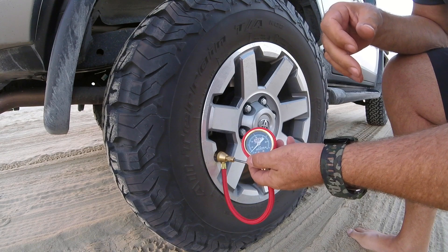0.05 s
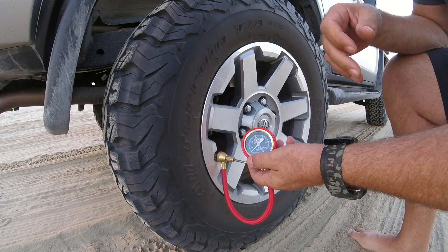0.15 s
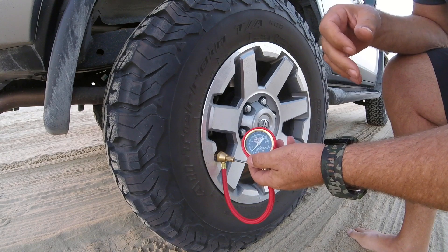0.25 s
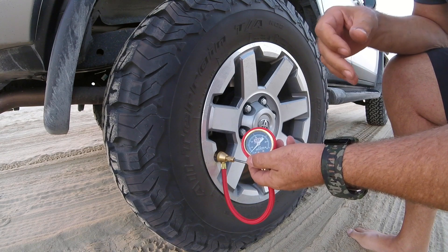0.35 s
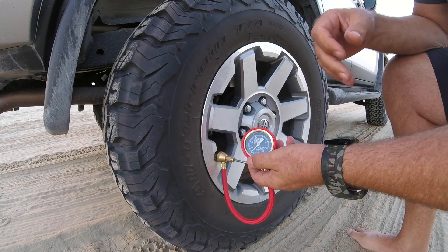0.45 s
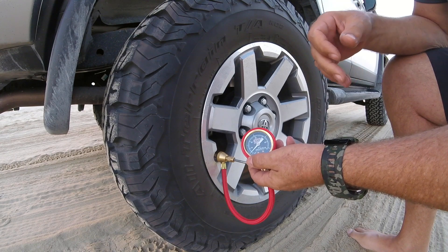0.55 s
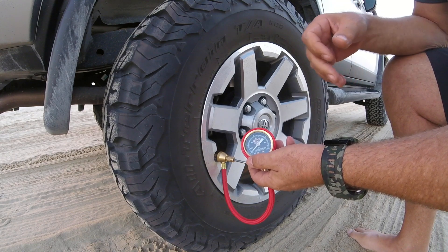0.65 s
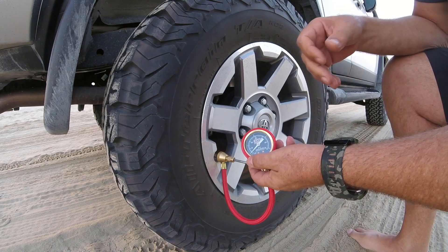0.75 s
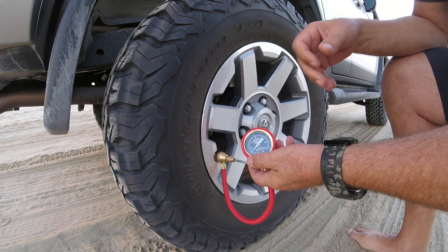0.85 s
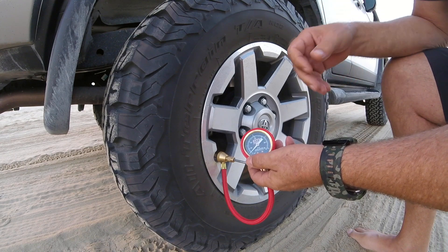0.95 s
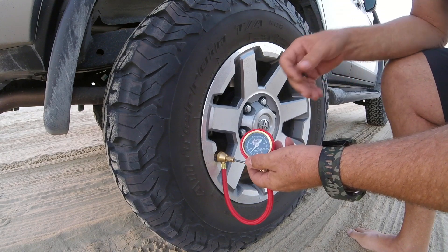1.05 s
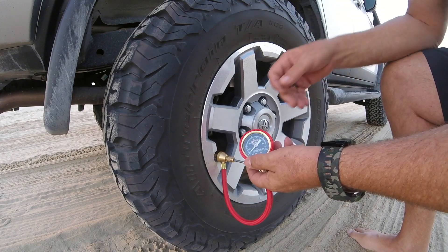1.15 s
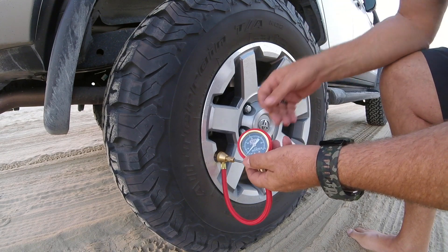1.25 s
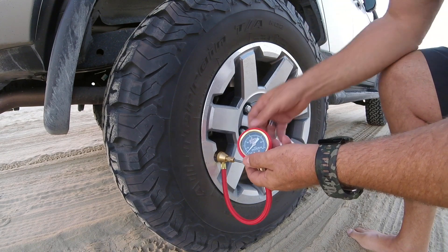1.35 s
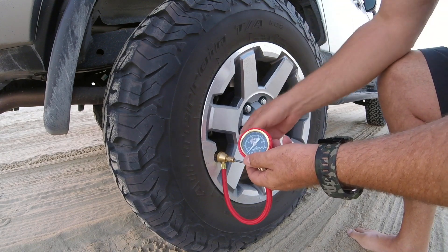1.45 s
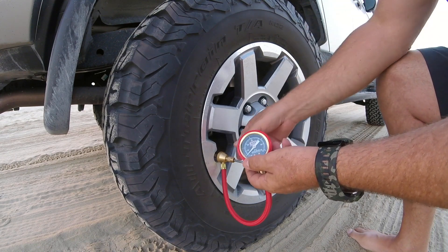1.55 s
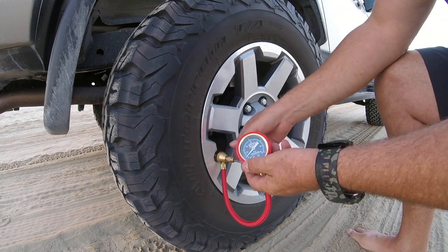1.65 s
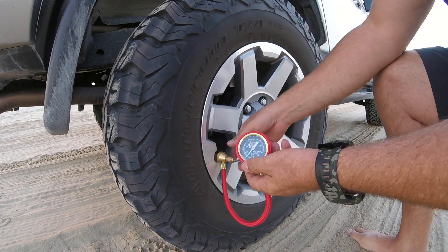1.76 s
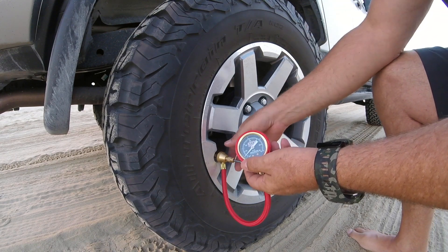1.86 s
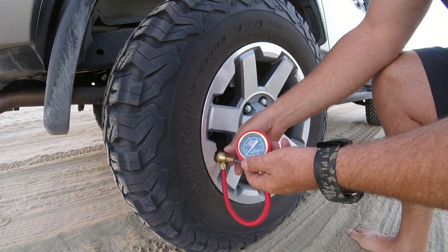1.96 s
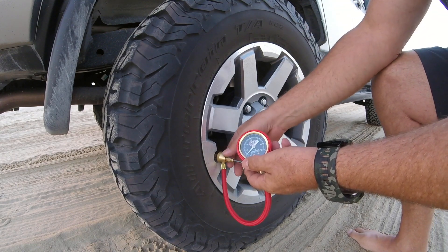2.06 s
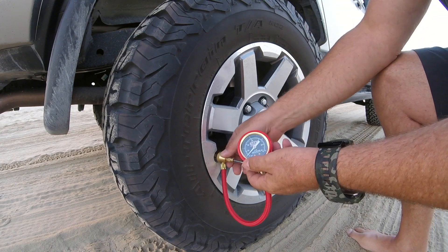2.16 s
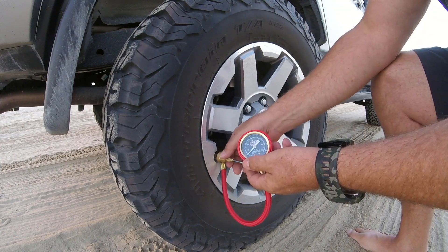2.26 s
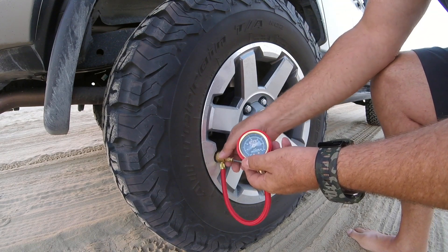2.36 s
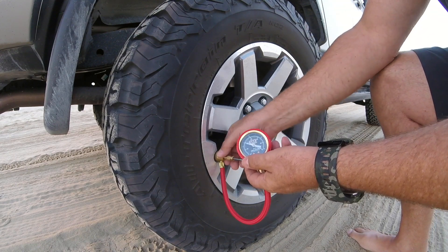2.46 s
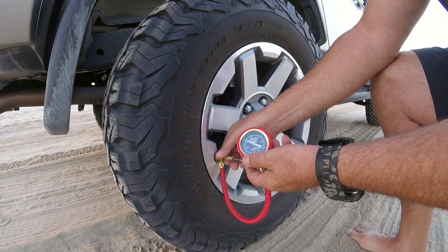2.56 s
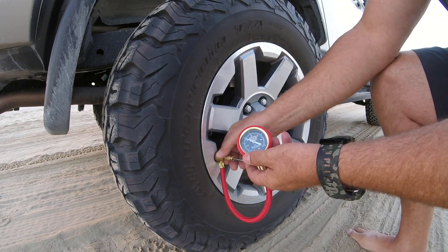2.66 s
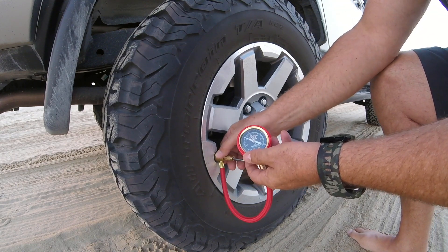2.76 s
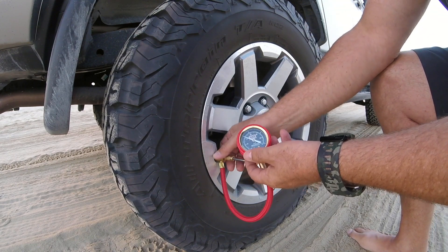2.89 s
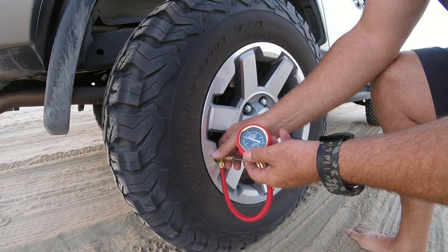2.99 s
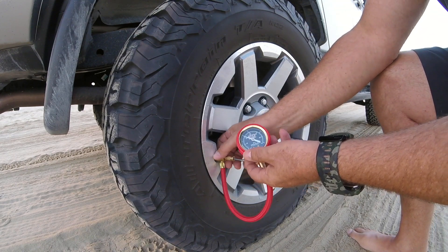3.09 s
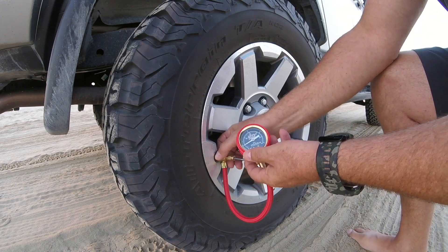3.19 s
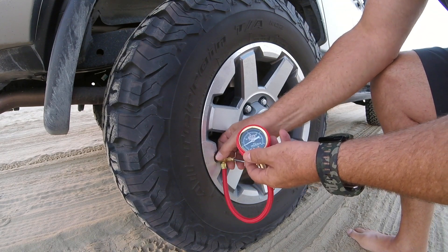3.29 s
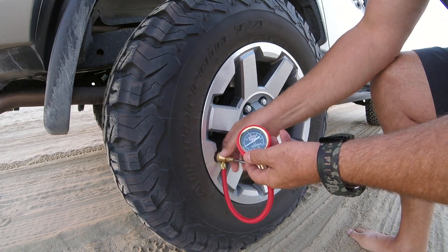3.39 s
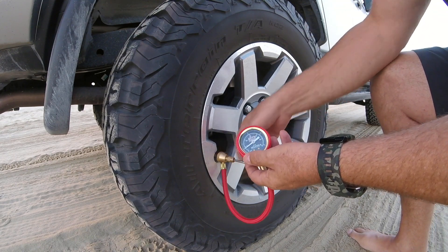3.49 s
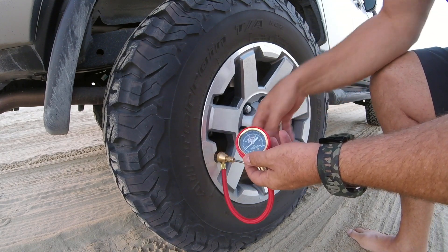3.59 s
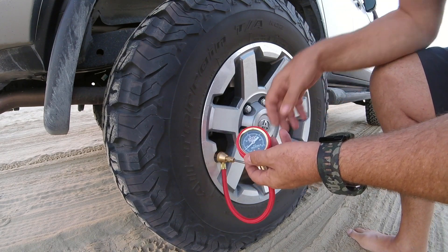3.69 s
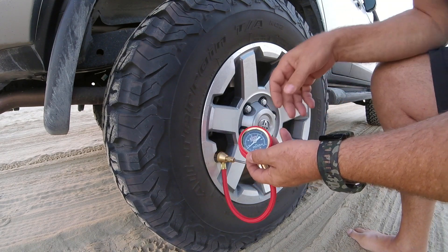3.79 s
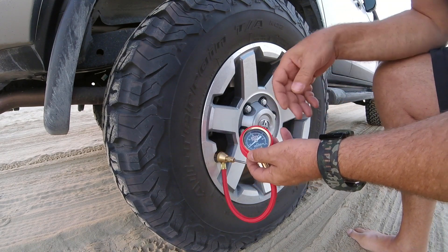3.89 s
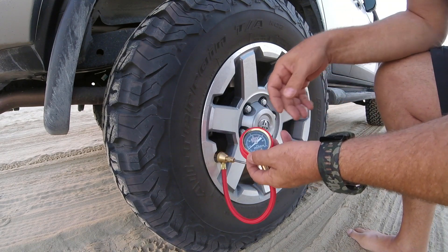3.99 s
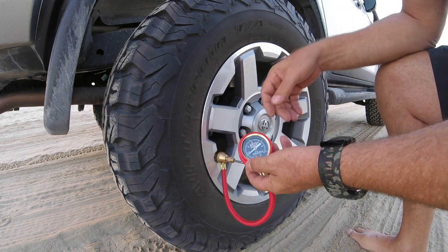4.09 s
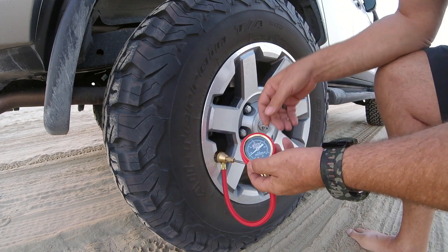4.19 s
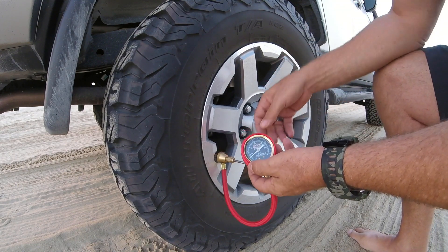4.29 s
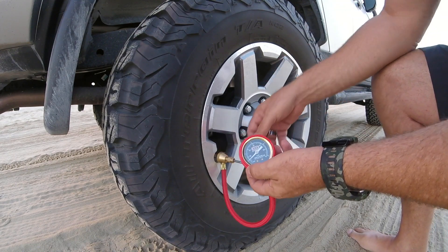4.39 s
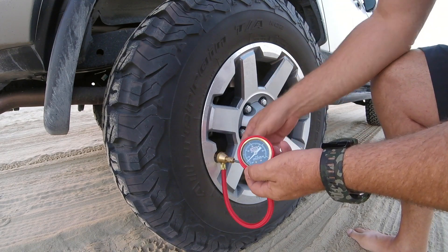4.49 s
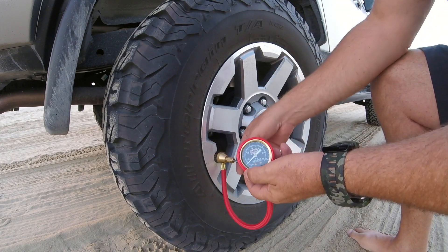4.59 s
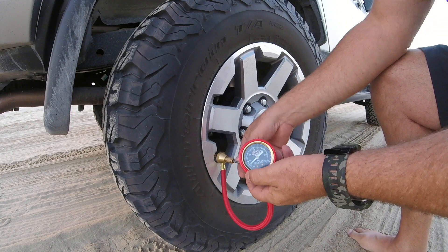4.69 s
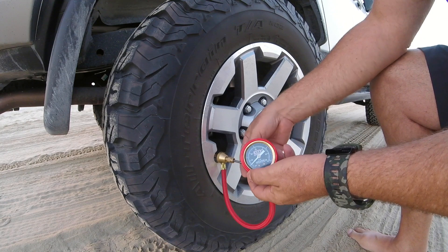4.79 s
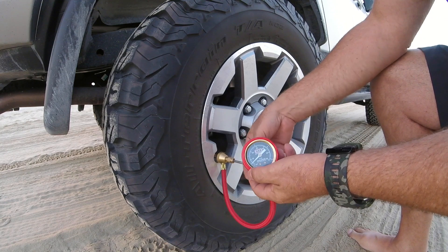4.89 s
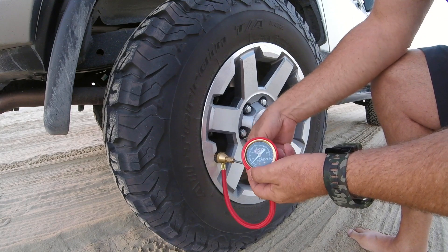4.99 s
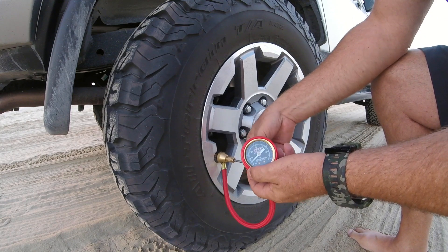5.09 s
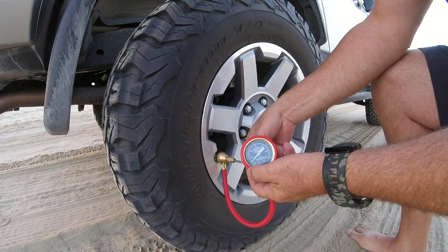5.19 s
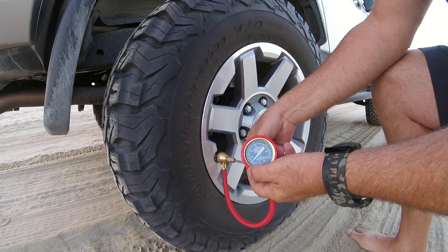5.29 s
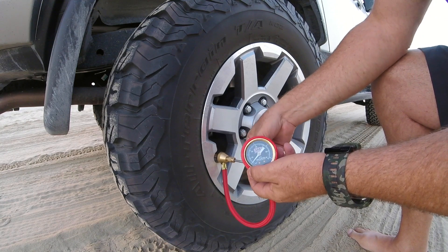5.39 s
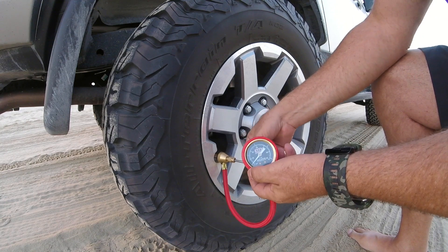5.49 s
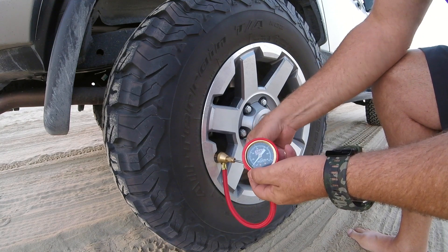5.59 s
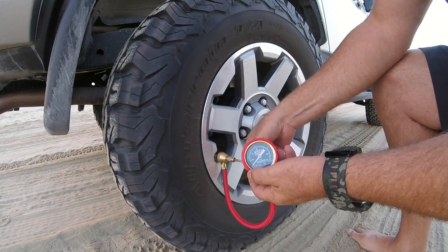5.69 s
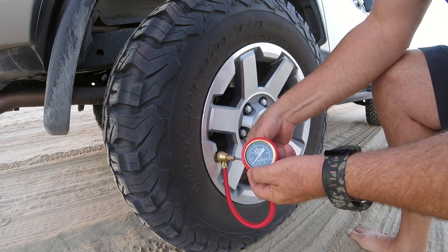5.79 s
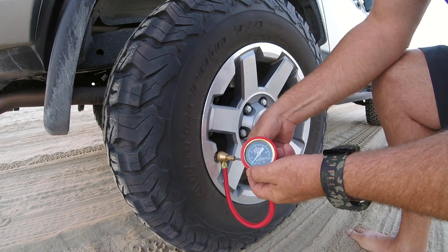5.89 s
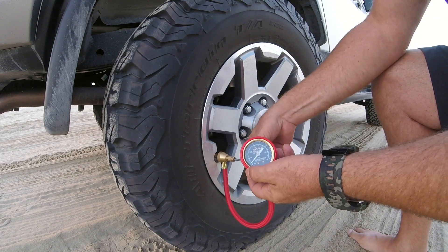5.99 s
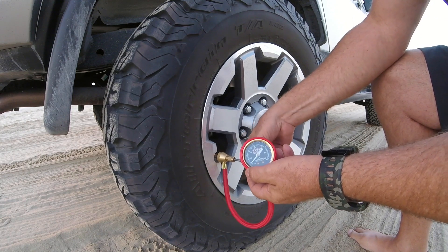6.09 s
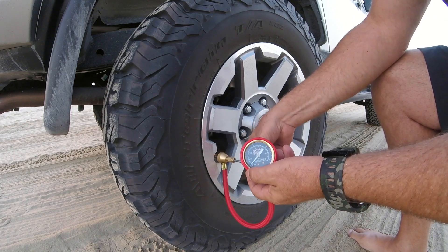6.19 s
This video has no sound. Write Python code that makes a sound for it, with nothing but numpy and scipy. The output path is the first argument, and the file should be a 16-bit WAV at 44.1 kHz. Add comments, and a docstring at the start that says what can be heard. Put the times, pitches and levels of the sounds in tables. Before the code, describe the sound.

Pressurised air hisses sharply from a car tire valve, cuts off for under a second, then resumes while an engine idles low nearby.

```python
"""Hiss of air from a car tire through a brass valve on open sand; the valve shuts for a moment and reopens.
A six-cylinder engine idles nearby, then speeds up a little; a second idles farther off, over wash and thuds.
Hiss: five bands of noise coloured by jet and valve-body resonances. Engines: sines on multiples of the cycle.
Valve ticks: short noise bands. Thuds: decaying sines. Background: coloured noise with drifting level."""
import sys
import numpy as np
from scipy import signal
from scipy.fft import rfft, irfft
from scipy.io import wavfile

SR = 44100
rng = np.random.default_rng(int(sys.argv[2]) if len(sys.argv) > 2 else 0)


def dump_mix(stems):
    """Bounce the given channels to the path in sys.argv[1] as a 16-bit WAV at rate SR."""
    frames = np.atleast_2d(stems).T  # one column per channel
    limited = np.clip(frames, -1, 1)  # hard clip at full scale
    pcm = np.round(limited * 32767).astype(np.int16)
    wavfile.write(sys.argv[1], SR, pcm)


N = 275625
TIME_S = np.arange(N) / SR


def amp(db):
    """Decibels to amplitude gain."""
    return 10 ** (np.asarray(db) / 20)


def rms_one(x):
    """Scale to rms 1."""
    return x / np.sqrt(np.mean(x ** 2) + 1e-30)


def in_time(rows):
    """Interpolate each column of a curve table to one value a sample; the first column is time_s."""
    time_s, *columns = np.transpose(rows)
    return [np.interp(TIME_S, time_s, column) for column in columns]


def drift(rate_hz):
    """Random wander, rms 1: white noise through two equal one-pole low-passes, run every 40 samples."""
    step, settle = 40, 2000
    pole = np.exp(-2 * np.pi * rate_hz * step / SR)
    noise = rng.standard_normal(N // step + settle + 2)
    slow = signal.lfilter([1], [1, -2 * pole, pole * pole], noise)[settle:]
    return np.interp(np.arange(N) / step, np.arange(len(slow)), rms_one(slow))


def coloured(points, modes=(), low_hz=1, high_hz=22000):
    """Noise, rms 1: a spectrum drawn through points plus resonance peaks, kept between two soft edges."""
    hz = np.arange(1, N // 2 + 2) * SR / N
    point_hz, point_db = np.transpose(points)
    power = amp(np.interp(np.log(hz), np.log(point_hz), point_db, -90, -90)) ** 2
    for centre_hz, width_hz, level_db in modes:
        # 1.24 makes width_hz roughly the half-power width
        power = power + amp(level_db) ** 2 / (1 + (1.24 * (hz - centre_hz) / width_hz) ** 2) ** 2
    edges = 1 / (1 + (low_hz / hz) ** 60) / (1 + (hz / high_hz) ** 60)
    spectrum = rfft(rng.standard_normal(N)) * np.sqrt(power * edges)
    return rms_one(irfft(spectrum, N))


# broad jet noise before and after the pause: freq_hz, relative_db_per_hz
JET_FIRST = [(300, -42), (900, -33.5), (1800, -26), (2600, -23.5), (4300, -23.5), (5200, -10),
             (6000, -15.5), (6850, -20), (8200, -20), (9300, -26), (10800, -27.5), (11700, -39),
             (13100, -30), (14200, -36.5)]
JET_SECOND = [(300, -35), (950, -31), (1900, -24), (3000, -16.5), (4300, -22), (5200, -9.5), (6050, -4.5),
              (6850, -14), (8200, -17), (9500, -20), (10600, -22.5), (11500, -39), (12700, -25),
              (14200, -30)]
# valve body and wheel resonances, free hand away or near: centre_hz, width_hz, relative_db_per_hz
BODY_FIRST_AWAY = [(640, 120, -31), (2778, 345, -13.5), (3463, 117, -13), (5645, 260, 1.5),
                   (6423, 160, -3.5), (6980, 120, -15.5), (7700, 110, -18.5), (8720, 170, -15),
                   (9550, 160, -18), (10200, 250, -27.5), (10620, 180, -25.5)]
BODY_FIRST_NEAR = [(2705, 460, -16.5), (3170, 100, -18.5), (3450, 74, -15.5), (4370, 22.5, -20),
                   (5690, 204, 1.5), (6410, 120, -4), (7010, 230, -16), (7630, 160, -19.5),
                   (8740, 140, -19), (9200, 100, -20.5), (9600, 140, -17), (10200, 96, -22.5),
                   (10600, 81, -29)]
BODY_SECOND_AWAY = [(630, 74, -23), (1436, 30, -21.5), (1760, 67, -20.5), (2820, 50, -19),
                    (3980, 270, -18.5), (5640, 250, 0), (6190, 64, -7), (7300, 110, -13.5), (7700, 72, -18),
                    (8600, 120, -21), (10200, 120, -20), (10800, 37, -31)]
BODY_SECOND_NEAR = [(650, 120, -23.5), (1420, 44, -23), (1757, 45, -20.5), (3470, 99, -16.5),
                    (3950, 130, -19), (5590, 150, -2.5), (6420, 120, 0.5), (7030, 85, -10),
                    (7720, 130, -13.5), (9650, 180, -24), (10300, 170, -19.5)]
# free hand comes near, once per spell: start_s, move_s
REACHES = [(1.3, 0.63), (4.2, .6)]
# hiss by pose (first away, first near, second away, second near): low_db, middle_db, treble_db
POSES = [(-44.5, -33.3, -35.5), (-44.8, -35.5, -35.3), (-47, -39, -36.5), (-46.5, -38.5, -36)]
SHUT_S, SHUT_TAKES_S, SHUT_BEND = 2.432, 0.045, 1.76  # starts to shut at SHUT_S
OPEN_S, OPEN_TAKES_S, OPEN_BEND = 3.222, 0.040, 3.8   # valve fully open at OPEN_S
SEALED_DB = -75                                      # end of each ramp; silent beyond it
SETTLE_DB, SETTLE_S = -3, 0.017                      # last of the flow builds up, time constant


def valve():
    """Valve flow gates two spells of hiss; reseating changes the colour."""
    shutting = np.clip((TIME_S - SHUT_S) / SHUT_TAKES_S, 0, 1) ** SHUT_BEND
    closed = np.clip((OPEN_S - TIME_S) / OPEN_TAKES_S, 0, 1) ** OPEN_BEND
    settling_s = np.maximum(TIME_S - OPEN_S + OPEN_TAKES_S / 2, 0)
    settling_db = SETTLE_DB * np.exp(-settling_s / SETTLE_S)
    first_gain = amp(SEALED_DB * shutting) * (shutting < 1)
    second_gain = amp(SEALED_DB * closed + settling_db) * (closed < 1)
    first = spell(REACHES[0], POSES[:2], JET_FIRST, (BODY_FIRST_AWAY, BODY_FIRST_NEAR))
    second = spell(REACHES[1], POSES[2:], JET_SECOND, (BODY_SECOND_AWAY, BODY_SECOND_NEAR))
    return first_gain * first + second_gain * second


def spell(reach, poses, broad, bodies):
    """One spell of hiss; the colour crosses over as the free hand comes near."""
    start_s, move_s = reach
    near = np.clip((TIME_S - start_s) / move_s, 0, 1)
    shares = np.sqrt(1 - near), np.sqrt(near)  # unrelated noises add as powers
    return sum(share * jet(pose, broad, body) for share, pose, body in zip(shares, poses, bodies))


# whistle bands: time_s, main_db, upper_db
WHISTLES = [(0, -26, -29), (1.2, -25.3, -28), (1.42, -25.2, -28), (1.62, -28.5, -29), (1.82, -24, -30),
            (2.03, -23.5, -28.8), (2.23, -26, -26), (2.43, -27.5, -30.5), (3.22, -24.5, -30.5),
            (3.45, -26.5, -26.5), (4.05, -25.7, -28.3), (4.63, -27.5, -30.5), (4.95, -29, -29),
            (5.35, -27.5, -26), (5.65, -26.5, -29), (6.05, -28, -29), (6.25, -26.5, -25)]
# offset of the other hiss bands from their pose: time_s, offset_db
BROAD = [(0, -0.9), (.2, 0), (.8, -.5), (1.02, 1.5), (1.45, -.5), (1.85, -.6), (2.22, .9), (2.43, -1.2),
         (3.22, 0), (4.05, -.5), (4.6, -0.8), (5.1, 0), (6.25, .5)]
# resonances heard in every pose: centre_hz, width_hz, relative_db_per_hz
BODY_ALWAYS = [(1180, 110, -33), (6100, 110, -12)]
SPURT_DB, SPURT_S = 5, 0.25  # extra low hiss around reopening, decay time constant
GRIP_S, GRIP_TAKES_S, GRIP_SHADE_DB = 2.1, 0.37, -3.5  # fingers close round the valve


def jet(pose, broad, body):
    """Turbulent jet exciting the valve body: five noise bands, shaded by the hands, fluttering in level."""
    main_db, upper_db = in_time(WHISTLES)
    offset_db, = in_time(BROAD)
    low_db, middle_db, treble_db = [db + offset_db for db in pose]
    since_open_s = TIME_S - OPEN_S
    reopened = since_open_s > -OPEN_TAKES_S
    low_db = low_db + SPURT_DB * np.exp(-np.abs(since_open_s) / SPURT_S) * reopened
    grip = np.clip((TIME_S - GRIP_S) / GRIP_TAKES_S, 0, 1) * (since_open_s < -OPEN_TAKES_S)
    middle_db = middle_db + GRIP_SHADE_DB * grip
    shared_flutter_db = 0.25 * drift(9)
    bands = [(1, 2000, low_db), (2000, 4500, middle_db), (4500, 6000, main_db),
             (6000, 6900, upper_db), (6900, 22000, treble_db)]
    out = np.zeros(N)
    for low_hz, high_hz, level_db in bands:
        flutter_db = shared_flutter_db + 0.59 * drift(6.9)
        out += amp(level_db + flutter_db) * coloured(broad, body + BODY_ALWAYS, low_hz, high_hz)
    return out


# valve sounds around the pause: start_s, level_db (before envelope), centre_hz, width_hz, decay_s
VALVE_TICKS = [(2.462, -67, 5130, 50, .035), (2.47, -72, 5600, 700, .05), (2.755, -75, 4700, 300, .012),
               (2.785, -71, 4800, 80, .008), (2.77, -70, 2100, 500, .09), (2.79, -72, 3300, 399.5, .06),
               (3.078, -60.5, 4900, 350, 0.013), (3.078, -60, 6000, 1400, .009)]


def valve_ticks():
    """Short puffs, finger rustle and faint brass ring: noise bands with 5 ms attack, exponential decay."""
    out = np.zeros(N)
    for start_s, level_db, centre_hz, width_hz, decay_s in VALVE_TICKS:
        since_s = np.maximum(TIME_S - start_s, 0)
        band = coloured([(10, -90), (20000, -90)], [(centre_hz, width_hz, 0)],
                        centre_hz - width_hz, centre_hz + width_hz)
        envelope = (1 - np.exp(-since_s / 0.005)) * np.exp(-since_s / decay_s)
        out += amp(level_db) * envelope * band
    return out


# near engine firing tone: time_s, firing_hz, level_db (rms before waver)
ENGINE = [(0, 104.8, -57), (.5, 105.4, -61), (1.1, 105.4, -53), (1.8, 105.7, -53), (2.3, 104.7, -54),
          (2.9, 105.2, -53.5), (3.1, 106.7, -44.5), (3.3, 112.1, -43.5), (3.5, 119.9, -37.5),
          (3.65, 123.9, -39), (3.9, 121.8, -38.5), (4.3, 119.6, -39), (4.7, 122.2, -40), (5.1, 123, -38),
          (6.25, 125.7, -38)]
# its other tones, rms before waver: cycle_multiple, idle_db, raised_db
OVERTONES = [(1, -72.5, -65), (2, -51.5, -57), (3, -56.5, -66), (4, -64.5, -59.5), (5, -68.5, -61),
             (7, -62, -53.5), (8, -59.5, -55), (9, -70.5, -68.5)]
IDLE_HZ, RAISED_HZ = 106, 115  # firing rates between which the balance shifts


def near_engine():
    """Six firings a cycle; the balance of tones shifts from idle to raised speed."""
    firing_hz, firing_db = in_time(ENGINE)
    raised = np.clip((firing_hz - IDLE_HZ) / (RAISED_HZ - IDLE_HZ), 0, 1)
    multiples = [multiple for multiple, _, _ in OVERTONES]
    gains = [amp((1 - raised) * idle_db + raised * raised_db) for _, idle_db, raised_db in OVERTONES]
    firing = tones(firing_hz, [1], [amp(firing_db)], waver_db=0.6)
    return firing + tones(firing_hz / 6, multiples, gains, waver_db=1.6)


def tones(cycle_hz, multiples, gains, waver_db):
    """Sines on multiples of an engine cycle, each with random phase and wavering level."""
    phase = 2 * np.pi * np.cumsum(cycle_hz) / SR
    out = np.zeros(N)
    for multiple, gain in zip(multiples, gains):
        waver = amp(waver_db * drift(3))
        sine = np.sin(multiple * phase + 2 * np.pi * rng.random())
        out += np.sqrt(2) * gain * waver * sine
    return out


# far engine, rms before waver: cycle_multiple, level_db
FAR = [(3, -59.5), (6, -64), (9, -62), (10, -64), (12, -72)]
FAR_CYCLE_HZ = 16.5  # mean


def far_engine():
    """A slower idle of slightly wandering speed, its tones fading in and out."""
    cycle_hz = FAR_CYCLE_HZ * (1 + 0.006 * drift(0.7))
    multiples, levels_db = zip(*FAR)
    return tones(cycle_hz, multiples, amp(levels_db), waver_db=4.5)


# dull thuds: start_s, level_db (before attack and decay), pitch_hz, t60_s
BUMPS = [(1.64, -43, 73.2, 1.8), (1.931, -27.5, 57.4, .25), (3.03, -38, 50, .2), (3.095, -37, 60.3, 0.22),
         (4.27, -32, 68.5, 0.29), (4.28, -37, 98.2, 0.96)]


def bumps():
    """Soft low thuds: sines with 10 ms attack and exponential decay."""
    out = np.zeros(N)
    for start_s, level_db, pitch_hz, t60_s in BUMPS:
        since_s = np.maximum(TIME_S - start_s, 0)
        attack = 1 - np.exp(-since_s / 0.01)
        out += amp(level_db - 60 * since_s / t60_s) * attack * np.sin(2 * np.pi * pitch_hz * since_s)
    return out


# open-air wash: freq_hz, relative_db_per_hz
AIR = [(120, -31), (180, -15), (290, -13), (450, -23), (800, -27.5), (1400, -32.5), (2000, -32.5),
       (4000, -45), (4900, -44), (5900, -45.5), (8000, -46), (12000, -58)]
# faint ridges in the wash: centre_hz, width_hz, relative_db_per_hz
AIR_MODES = [(1170, 120, -25), (6600, 300, -38)]
# low rumble of wind and engines: freq_hz, relative_db_per_hz
RUMBLE = [(15, -7), (30, 4.5), (60, 2), (110, 4), (170, -10), (230, -35.5)]
# background levels before drift: time_s, wash_db, rumble_db
AROUND = [(0, -61.5, -53), (1.5, -61, -55.5), (2.4, -60, -56), (2.7, -62, -53), (3.0, -59.5, -49),
          (3.4, -58, -54), (4, -63, -58), (5.6, -61.5, -56), (6.25, -58, -53)]


def background():
    """Distant wash and lumpy low rumble: coloured noises, each drifting in level."""
    wash_db, rumble_db = in_time(AROUND)
    wash = amp(wash_db + 0.96 * drift(4.7)) * coloured(AIR, AIR_MODES)
    rumble = amp(rumble_db + 2.95 * drift(5.0)) * coloured(RUMBLE)
    return wash + rumble


def scene():
    """All sources summed at one microphone."""
    return (valve() + valve_ticks() + near_engine() + far_engine() + bumps() + background())[None]


CUTOFF_HZ = 13850


def record(dry):
    """Steep elliptic low-pass: 0.3 dB ripple, 80 dB stopband."""
    return signal.sosfilt(signal.ellip(14, 0.3, 80, CUTOFF_HZ, fs=SR, output="sos"), dry)


dry = scene()
out = record(dry)
dump_mix(out)
```